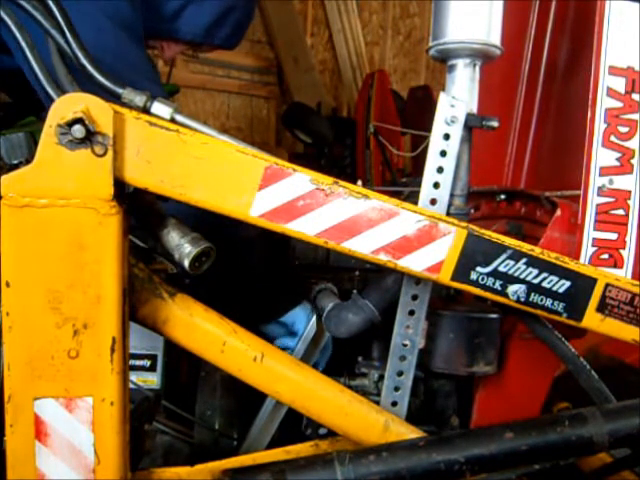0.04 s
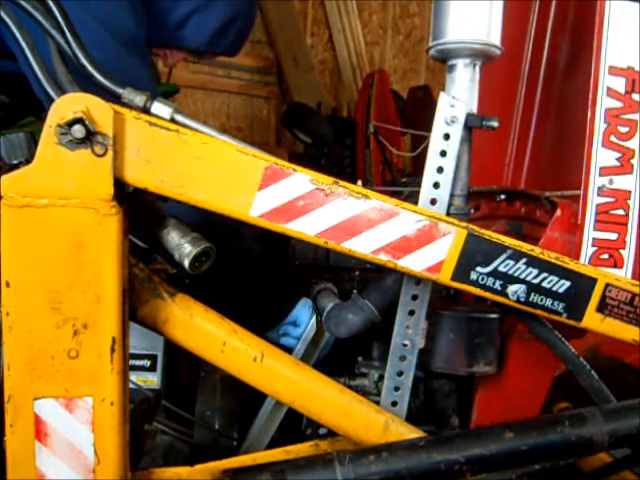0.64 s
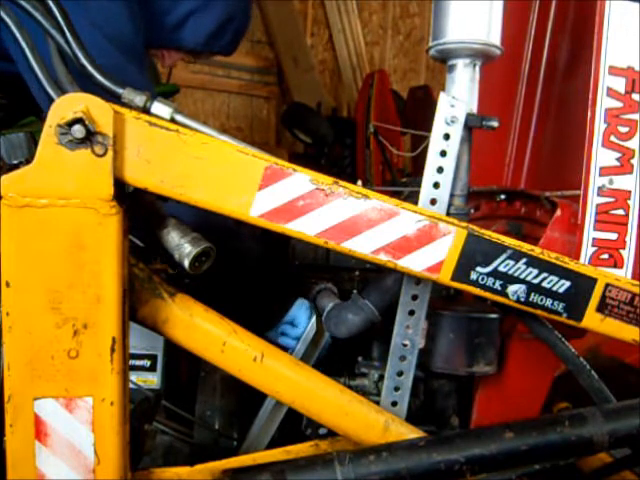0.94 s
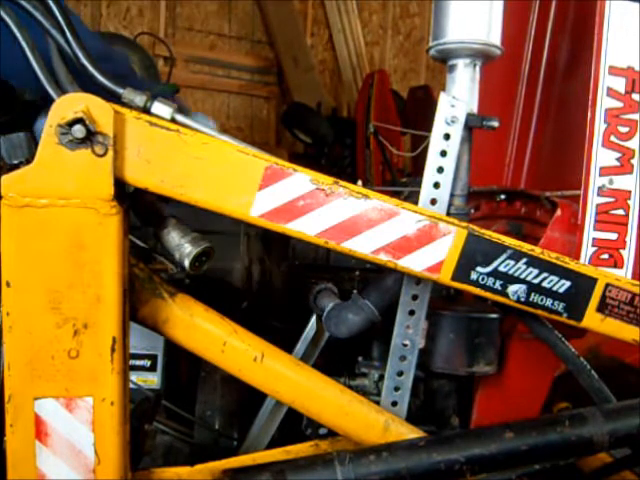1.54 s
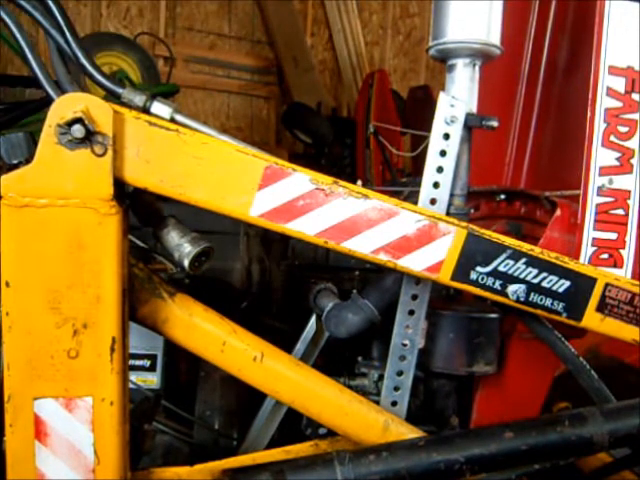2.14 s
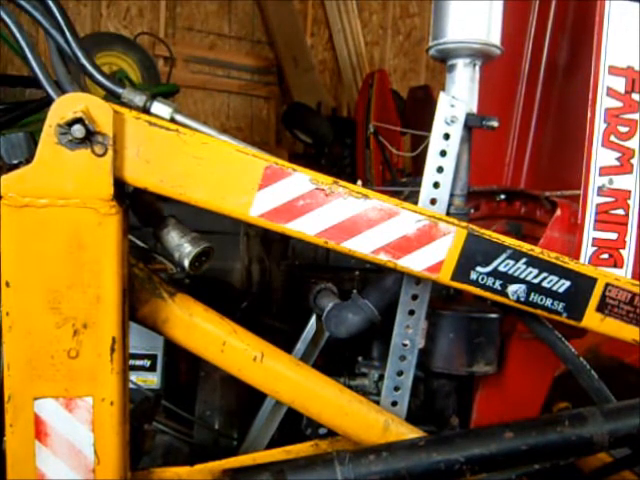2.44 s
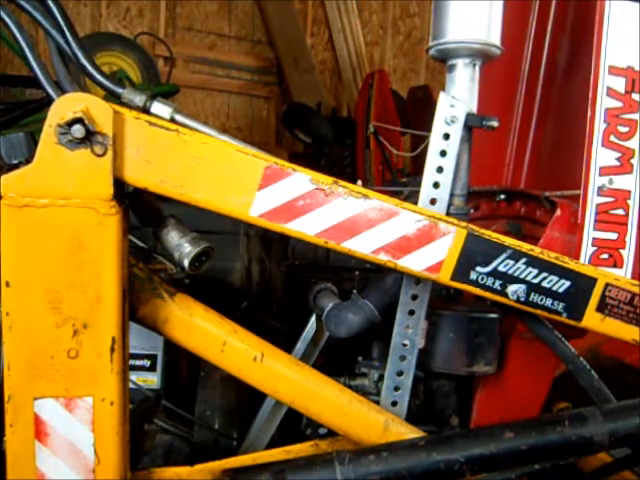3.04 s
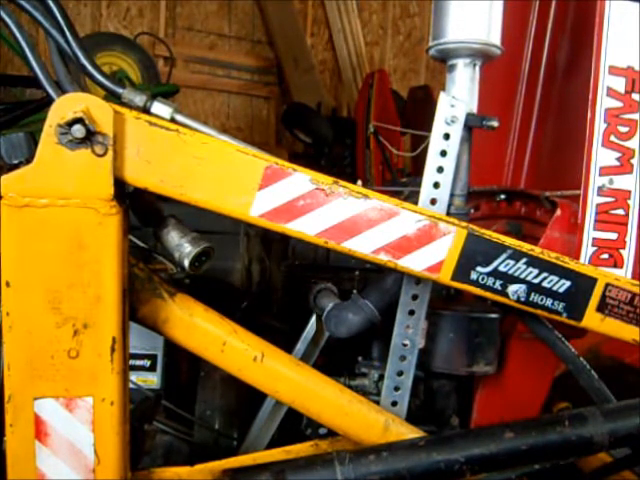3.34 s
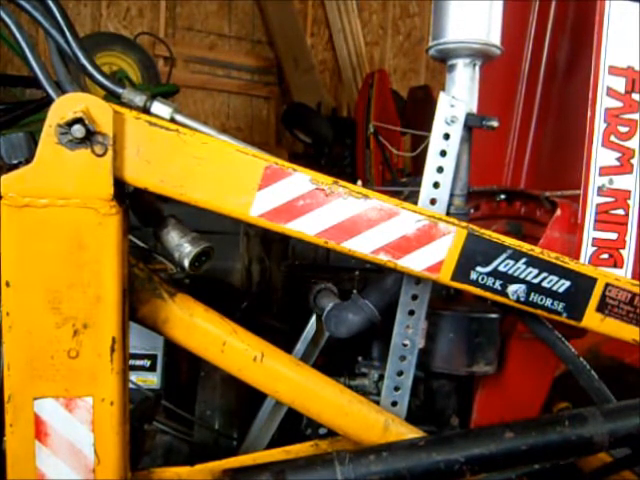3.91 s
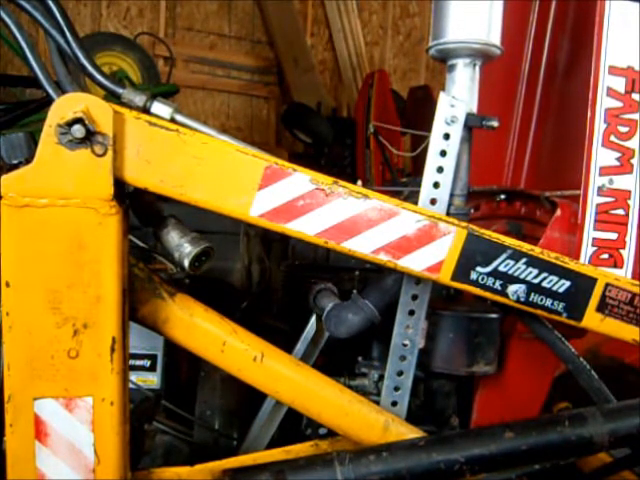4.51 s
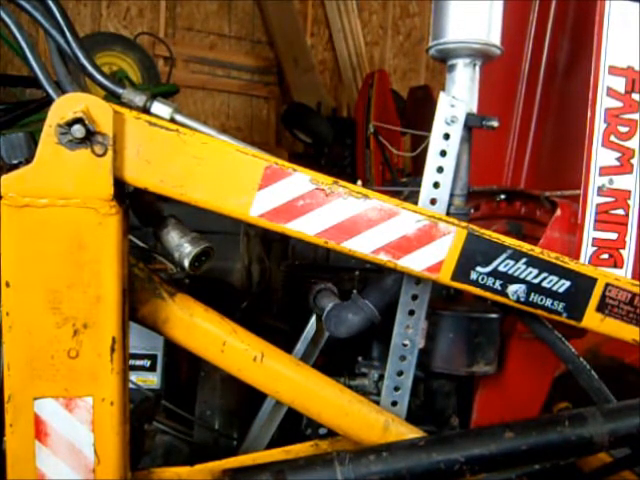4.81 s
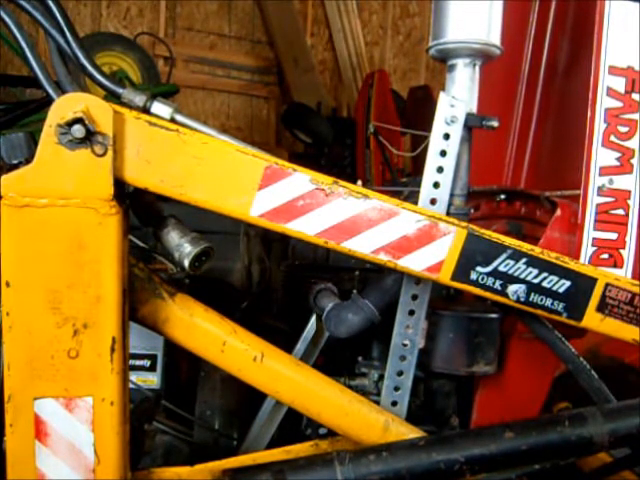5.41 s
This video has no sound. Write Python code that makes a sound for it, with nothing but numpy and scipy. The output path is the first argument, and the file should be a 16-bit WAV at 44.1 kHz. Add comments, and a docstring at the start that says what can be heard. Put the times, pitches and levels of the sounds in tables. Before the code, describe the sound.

In a wooden shed, hands work an engine's controls with dull knocks and a dry slide over a soft rush of air. Metal snaps and rings, and the single cylinder lurches once with a hollow shudder. After a sharp clank the engine turns over slowly, as if on its starter, with dry squeaks, deep exhaust puffs, valve clacks and ringing knocks over a drone of gears.

```python
"""Dull knocks and a dry slide over a soft rush of air: hands work the controls of an engine in a wooden
shed. Metal snaps and rings, the single cylinder lurches and stumbles, then after a sharp clank it turns
over slowly, as if on its starter. Each cycle brings dry squeaks, a deep exhaust puff, valve clacks and
a ringing knock as the piston tops its compression, over frame thumps and a drone of gears and casing."""
import sys
import numpy as np
from scipy import signal
from scipy.fft import rfft, irfft, next_fast_len
from scipy.io import wavfile
from scipy.ndimage import map_coordinates

SR = 44100
rng = np.random.default_rng(int(sys.argv[2]) if len(sys.argv) > 2 else 0)


def generate_wav(sig):
    """Save sig (samples, or channels by samples) to the path in sys.argv[1] as 16-bit PCM at SR."""
    pcm = np.round(np.clip(np.atleast_2d(sig).T, -1, 1) * 32767).astype(np.int16)
    wavfile.write(sys.argv[1], SR, pcm)


N = 245195

AIR_LEVELS = [(0.0, -46), (0.8, -44.3), (1.3, -43.5), (1.6, -41.3)]  # rush of air: time_s, level_db
RUMBLE_LEVELS = [(0.0, -58.5), (1.86, -48), (3.4, -58.5), (3.7, -44.5), (5.56, -51.5)]  # low rumble: time_s, level_db
# dull knocks of the controls and first kicks: start_s, level_db, tilt_db_per_octave, cutoff_hz, t60_s
CLUNK_HITS = [(0.212, -39, -2.5, 6000, 0.051), (1.597, -40, -3, 2500, 0.29), (1.658, -31, -1, 3280, 0.15),
              (2.164, -25.5, 1, 4800, 0.079), (2.31, -37.5, 1, 5000, 0.75), (2.818, -29, 1.5, 7000, 0.071),
              (2.828, -26.5, -1, 5500, 0.038), (2.88, -25.5, 3, 9000, 0.051),
              (2.938, -22, -.5, 8000, 0.039), (2.949, -20, -0.5, 9000, .09),
              (3.013, -29, -2.5, 3000, 0.055), (3.17, -36, 2.5, 4200, 0.38)]
SNAP_HITS = [(0.65, -32, 0, 5970, 0.024), (2.525, -16, 0.8, 6570, 0.037), (3.345, -14, 1, 9000, .028)]  # hard metal snaps: start_s, level_db, tilt_db_per_octave, cutoff_hz, t60_s
RINGING_PARTS = [(.214, 480, 300, -41.5, 0.59), (.388, 1030, 240, -41, 0.45),
                 (.6503, 3700, 900, -34, 0.016), (.69, 457, 197, -46.5, 0.56), (1.66, 338, 119, -37, 0.23),
                 (2.525, 2820, 2400, -24, 0.28), (2.526, 4660, 520, -37.5, 1.6),
                 (2.833, 2350, 300, -27.5, 0.042), (2.949, 630, 160, -18.5, 0.075),
                 (3.345, 1240, 199, -21, 0.11), (3.345, 5300, 350, -20, 0.026),
                 (3.345, 5900, 1800, -22.5, 0.21), (3.352, 500, 340, -25, 0.46)]  # knocked parts: start_s, pitch_hz, width_hz, level_db, t60_s
PING_NOTES = [(2.525, 2170, -37, 0.6), (3.346, 1344, -30.5, 1.1), (3.345, 1810, -28, .18),
              (3.345, 3440, -24.5, .16), (3.83, 5030, -19.5, 0.067)]  # clear notes of jarred metal, and a brief high chirp among the squeaks at 3.83 s: start_s, pitch_hz, level_db, t60_s
DRONE_LEVELS = [(3.42, -11), (3.48, -7), (3.55, -1.5), (3.68, -0.5), (3.93, 2.5), (4.28, 2.5), (4.6, -0.5),
                (5.56, -.5)]  # cranking effort against steady turning: time_s, gain_db
GEAR_STRAINS = [(3.897, 8.5, .045), (4.235, 5, 0.056), (4.537, 8, .025), (4.844, 3, 0.036)]  # compressions loading the gears: peak_s, strain_db, half_width_s
FRAME_JOLTS = [(3.5, -34, 0.2), (3.548, -30, .15), (3.765, -28, 0.12), (3.93, -28.5, 0.76),
               (4.11, -28, 0.083), (4.268, -28.5, 0.56), (4.596, -32.5, 0.77), (4.912, -32, 0.62),
               (5.231, -33.5, 0.38), (5.378, -32.5, .2)]  # thumps of the frame: start_s, level_db, damping_t60_s
SQUEAK_RUBS = [(3.561, 0.08, -17.5), (3.792, 0.044, -18), (3.959, 0.031, -24.5), (4.136, 0.031, -22),
               (4.294, 0.048, -21), (4.466, 0.036, -25.5), (4.62, 0.03, -22), (4.787, 0.032, -22.5),
               (4.941, .046, -24), (5.106, 0.037, -25), (5.259, 0.048, -24.5), (5.427, 0.034, -23)]  # one dry rub a turn: start_s, length_s, level_db
VALVE_TAPS = [(3.72, -23, 9.5, 0.068), (3.77, -29, 19, .1), (3.822, -28.5, -19.5, .2),
              (3.838, -24, -2, 0.091), (3.936, -28.5, 15, .08), (4.07, -27, 11, 0.25),
              (4.175, -20.5, 1, 0.07), (4.268, -30, 19.5, 0.065), (4.4, -30.5, 12, .1),
              (4.499, -25.5, 2, 0.08), (4.594, -34, 22, .05), (4.663, -31, -14, 0.08), (4.822, -25, 0, .12),
              (4.916, -34.5, 23, .06), (4.984, -31.5, -2, .07), (5.046, -29.5, 16, 0.082),
              (5.142, -25, 3.5, 0.085), (5.305, -28.5, -3.5, .06), (5.371, -25.5, 18, .045),
              (5.461, -26, 3.5, 0.12)]  # valve gear: start_s, level_db, treble_lift_db, t60_s
EXHAUST_PUFFS = [(3.721, -18), (4.074, -19), (4.403, -21.5), (4.723, -23), (5.046, -25.5), (5.367, -26)]  # the puff that opens each cycle: start_s, relative_db
PISTON_KNOCKS = [(3.9777, 0.5, 3800), (4.348, 0.5, 4670), (4.6841, 1, 2890), (4.997, -1.5, 3840),
                 (5.3246, -1, 2870)]  # tops of compression: start_s, relative_db, accent_hz

SHED_DECAY = [(200, 0.87), (1000, 0.54), (3500, 0.39), (8000, 0.27)]  # reverb of the wooden walls: frequency_hz, t60_s
CASING_MODES = [(292.5, 9, -0.5), (359, 11, -6.5), (467, 32, -4), (587.5, 16, -9)]  # humming casing: pitch_hz, width_hz, gain_db
FRAME_MODES = [(86.6, 0, .4), (146.3, 1.5, 0.23), (170.7, -3, 0.37), (205.5, 2.5, .3)]  # heavy frame: pitch_hz, gain_db, t60_s
METAL_MODES = [(1730, -7.5, 0.15), (2155, -6.5, 0.28), (2360, -14.5, 0.2), (2895, -2.5, .14),
               (3780, -5.5, 0.11), (4760, -4, .08), (5157, -10.5, 0.17), (5370, -6, .06),
               (6400, -12.5, .19)]  # bright engine metal: pitch_hz, gain_db, t60_s

# tone colour of each source: frequency_hz, gain_db
AIR_EQ = [(15, -16), (30, 0), (70, -5), (110, -11.5), (200, -8.5), (500, -9.5), (1400, -12), (6000, -17.5),
          (7800, -22)]
RUMBLE_EQ = [(15, -23), (30, -4.5), (75, 5), (130, -6.5), (260, -30.5), (500, -76)]
CLUNK_EQ = [(120, -13.5), (220, -8), (330, 3), (460, -7), (620, 2), (950, -5), (2400, -3), (4200, -8),
            (7800, -15)]
SNAP_EQ = [(200, -24), (330, -1), (480, -18.5), (700, -1), (1400, -2), (3800, 1), (5200, -5), (7800, -8.5)]
SLIDE_EQ = [(150, -14.5), (300, 6), (1100, -10), (2200, 0), (3800, 5), (5000, -3.5), (7500, -5)]
STUMBLE_EQ = [(110, -18), (230, -14.5), (370, -6), (480, -5), (610, 5), (850, -8), (2000, -8),
              (4200, -16.5), (7500, -30)]
CHURN_EQ = [(70, -35), (120, -6), (190, -1), (240, -3), (310, 0.5), (600, -2), (1100, -19.5), (2000, -61)]
RATTLE_EQ = [(300, -9), (700, 1), (1150, -2.5), (1600, -0.8), (2300, -4), (3500, -2), (4300, -16),
             (7500, -22)]
GROAN_EQ = [(260, -29), (360, -1.5), (520, -1.5), (640, 4), (800, -4.5), (1200, -23)]
CLACK_EQ = [(400, -37), (750, 6), (1050, -0.5), (1500, 7), (2250, 7.5), (3800, 5), (4400, 1.5),
            (7500, -9.5)]
KNOCK_EQ = [(300, -27), (520, -12.5), (1110, -12.5), (1740, -5.5), (2470, -11), (2840, 0.5), (3210, -9),
            (3810, -1), (4260, -9), (5370, -5), (7800, -15.5)]

SCENE_T, HIT_T = np.arange(N) / SR, np.arange(SR // 2) / SR  # seconds across the scene and one hit


def amp(db):
    return 10 ** (np.asarray(db) / 20)


def unit_rms(x):
    return x / np.sqrt(np.mean(x ** 2) + 1e-20)


def unit_onset(x):
    """Scale a hit to rms 1 over its first 20 ms."""
    return x / np.sqrt(np.mean(x[:SR // 50] ** 2) + 1e-20)


def curve_at(points, hz):
    """Read a curve on a log frequency axis."""
    point_hz, values = np.transpose(points)
    return np.interp(np.log(hz + 1), np.log(point_hz + 1), values)


def fader(points):
    """Ride the gain through the points, fading out within 50 ms beyond either end."""
    times, db = np.transpose(points)
    inside_s = np.minimum(SCENE_T - times[0], times[-1] - SCENE_T)
    return np.clip(inside_s * 20 + 1, 0, 1) ** 2 * amp(np.interp(SCENE_T, times, db))


def swell(peak_s, peak_db, rise_db_per_s, fall_db_per_s):
    """A gain that climbs to one peak and dies away."""
    t = SCENE_T - peak_s
    return amp(peak_db + np.minimum(rise_db_per_s * t, -fall_db_per_s * t))


def attack(rise_s):
    return 1 - np.exp(-HIT_T / rise_s)


def decay(t60_s):
    return amp(-60 * HIT_T / t60_s)


def wobble(rate_hz, n=N):
    """A smooth random drift."""
    knots = rng.standard_normal(int(n * rate_hz / SR) + 4)
    return map_coordinates(knots, [np.arange(n) * rate_hz / SR])


def filtered(x, response):
    """Apply a gain that depends on frequency."""
    size = next_fast_len(len(x) + SR // 4)
    return irfft(rfft(x, size) * response(np.fft.rfftfreq(size, 1 / SR)), size)[:len(x)]


def coloured(x, eq):
    """Shape x with an EQ curve, at rms 1."""
    return unit_rms(filtered(x, lambda hz: amp(curve_at(eq, hz))))


def burst(t60_s, rise_s):
    """The noise of one contact: quick attack, fast decay."""
    return rng.standard_normal(len(HIT_T)) * decay(t60_s) * attack(rise_s)


def chatter(per_second, spread_db, t60_s):
    """Many small contacts at uneven times and strengths."""
    sizes = amp(spread_db * rng.uniform(-1, 1, N))
    contacts = (rng.random(N) < per_second / SR) * sizes
    power = signal.fftconvolve(contacts ** 2, decay(t60_s) ** 2)[:N]
    return unit_rms(np.sqrt(np.abs(power)) * rng.standard_normal(N))


def struck(modes, spread_db, rise_s):
    """Struck metal: every hit wakes each mode at a new strength."""
    hz, db, t60_s = np.transpose(modes)[:, :, None]
    envelopes = amp(db + spread_db * rng.standard_normal(hz.shape)) * decay(t60_s)
    partials = np.sin(2 * np.pi * (hz * HIT_T + rng.random(hz.shape)))
    return unit_onset(np.sum(envelopes * partials, axis=0) * attack(rise_s))


def shed(x, wet_db):
    """Add the reverb of the wooden walls, where the treble dies first."""
    hz, t, spectrum = signal.stft(rng.standard_normal(SR // 2), SR, nperseg=256)
    fade = amp(-60 * t / curve_at(SHED_DECAY, hz)[:, None])
    tail = signal.istft(spectrum * fade, SR, nperseg=256)[1]
    return x + amp(wet_db) * signal.fftconvolve(x, tail / np.linalg.norm(tail))[:len(x)]


def air():
    """A soft rush around the shed, and a low rumble that is strongest as the cranking begins."""
    level_db = np.interp(SCENE_T, *np.transpose(AIR_LEVELS)) + 3.5 + wobble(8) / 2
    rush = amp(level_db) * coloured(rng.standard_normal(N), AIR_EQ)
    rumble = fader(RUMBLE_LEVELS) * coloured(rng.standard_normal(N), RUMBLE_EQ)
    return rush + rumble


def blows(hits, eq, rise_s, wet_db):
    """Metal and wood strike together: the softer the contact, the darker the hit."""
    out = np.zeros(N)
    for start_s, db, tilt, cutoff_hz, t60_s in hits:
        tilted_eq = [(hz, gain_db + tilt * np.log2(hz)) for hz, gain_db in eq]
        lowpass = signal.butter(4, cutoff_hz, fs=SR, output='sos')
        contact = signal.sosfilt(lowpass, burst(t60_s, rise_s))
        add(out, start_s, amp(db) * unit_onset(coloured(shed(contact, wet_db), tilted_eq)))
    return out


def ringing_parts():
    """A knocked part's close modes ring on as one fuzzy, fading note."""
    out = np.zeros(N)
    for start_s, hz, width, db, t60_s in RINGING_PARTS:
        band = [(hz - width, -30), (hz - width / 2, 0), (hz + width / 2, 0), (hz + width, -30)]
        cluster = coloured(rng.standard_normal(len(HIT_T)), band)
        add(out, start_s, amp(db) * unit_onset(cluster * decay(t60_s) * attack(.0019)))
    return out


def slide():
    """A dry metal part slides with an even hiss that swells and fades."""
    stroke = swell(peak_s=2.095, peak_db=-28.3, rise_db_per_s=68, fall_db_per_s=75)
    return stroke * coloured(rng.standard_normal(N), SLIDE_EQ)


def pings():
    """Single modes of jarred metal sing out as clear notes; a brief high chirp sounds among the squeaks."""
    out = np.zeros(N)
    for start_s, hz, db, t60_s in PING_NOTES:
        add(out, start_s, amp(db) * np.sin(2 * np.pi * hz * HIT_T) * decay(t60_s) * attack(.002))
    return out


def stumble():
    """The engine lurches round once with a hollow shudder; loose parts rattle on as it settles."""
    shudder = shed(chatter(per_second=300, spread_db=3, t60_s=.035), wet_db=-2)
    lurch = swell(peak_s=2.952, peak_db=-19, rise_db_per_s=150, fall_db_per_s=150)
    settle = swell(peak_s=2.95, peak_db=-37.5, rise_db_per_s=300, fall_db_per_s=24)
    return np.hypot(lurch, settle) * coloured(shudder, STUMBLE_EQ)


def cycle_swing(peak_share, outer_cycle_s=.33):
    """One swing of -1 to 1 a cycle, cresting peak_share of the way from puff to puff."""
    puff_s = [row[0] for row in EXHAUST_PUFFS]
    starts = [puff_s[0] - outer_cycle_s, *puff_s, puff_s[-1] + outer_cycle_s]
    cycle = np.interp(SCENE_T, starts, np.arange(len(starts)))
    return np.cos(2 * np.pi * (cycle - peak_share))


def gears(sag_per_db=.012):
    """Gears churn and rattle; under each early compression their groan swells and sags in pitch."""
    churn = coloured(chatter(per_second=150, spread_db=3.5, t60_s=.04), CHURN_EQ)
    teeth = chatter(per_second=280, spread_db=3.5, t60_s=.02)
    rattle = coloured(shed(teeth, wet_db=.5), RATTLE_EQ)
    strain_db = sum(db * np.exp(-((SCENE_T - s) / width) ** 2) for s, db, width in GEAR_STRAINS)
    steady_groan = coloured(rng.standard_normal(N), GROAN_EQ)
    groan = map_coordinates(steady_groan, [np.cumsum(1 - sag_per_db * strain_db)])
    swing_db = cycle_swing(peak_share=.63)
    return (amp(-34.5 + swing_db + .4 * strain_db) * churn
            + amp(-42.5 + swing_db + 1.83 * strain_db) * groan
            + amp(-32 + .34 * strain_db) * rattle)


def casing_hum(level_db=-35.5, swing_db=5.5, build_s=.33):
    """The casing's hum builds up and sinks at each compression; wider resonances waver faster."""
    hum = np.zeros(N)
    for hz, width_hz, db in CASING_MODES:
        strength = amp(db + 2.8 * wobble(2 * width_hz))
        hum += strength * np.sin(2 * np.pi * hz * SCENE_T + 1.26 * wobble(width_hz))
    cranking_s = np.maximum(SCENE_T - DRONE_LEVELS[0][0], 0)
    build_up = 1 - np.exp(-cranking_s / build_s)
    return amp(level_db + swing_db * cycle_swing(peak_share=.36)) * build_up * unit_rms(hum)


def frame_jolts():
    """The crank's changes of load thump the heavy frame."""
    out = np.zeros(N)
    for start_s, db, t60_s in FRAME_JOLTS:
        thump = struck(FRAME_MODES, spread_db=1, rise_s=.0036) * decay(t60_s)
        add(out, start_s, amp(db) * unit_onset(thump))
    return out


def squeaks(base_hz=3425, arch_share=.0604):
    """A dry part rasps once a turn, less as it frees; a hard, quick rub arches highest in pitch."""
    out = np.zeros(N)
    hardest = max(amp(db) / length_s for _, length_s, db in SQUEAK_RUBS)
    for start_s, length_s, db in SQUEAK_RUBS:
        arch = np.sin(np.pi * np.clip(HIT_T / length_s, 0, 1))
        pressure = amp(db) / length_s / hardest
        pitch_hz = base_hz * (1 + arch_share * pressure * arch + .016 * wobble(500, len(HIT_T)))
        rasp = unit_rms(1 + .55 * wobble(520, len(HIT_T)))
        tone = np.sqrt(np.abs(arch)) * np.sin(2 * np.pi * np.cumsum(pitch_hz) / SR) * rasp
        add(out, start_s, amp(db) * shed(tone, wet_db=-4))
    return out


def valve_clacks():
    """The valve gear taps the engine's metal: a crisp contact, its echo and a faint ring."""
    out = np.zeros(N)
    for start_s, db, lift_db, t60_s in VALVE_TAPS:
        eq = [(hz, gain_db + lift_db * np.clip(np.log2(hz / 2500), 0, 1)) for hz, gain_db in CLACK_EQ]
        contact = unit_onset(coloured(burst(t60_s, rise_s=.0013), eq))
        tap = shed(contact, wet_db=-1.5)
        ring = amp(-11) * struck(METAL_MODES, spread_db=6, rise_s=.003)
        add(out, start_s, amp(db) * (tap + ring))
    return out


def exhaust_puffs(pitch_hz=38):
    """The exhaust lets out one soft, deep push of gas a cycle."""
    out = np.zeros(N)
    push = np.sin(2 * np.pi * pitch_hz * HIT_T) * np.exp(-((HIT_T - .014) / .014) ** 2)
    for start_s, db in EXHAUST_PUFFS:
        gas = unit_onset(coloured(burst(t60_s=.14, rise_s=.01), RUMBLE_EQ))
        add(out, start_s, amp(db - 9) * push + amp(db - 11) * gas)
    return out


def piston_knocks(accent_db=7, width_hz=270):
    """The piston tops its compression: a light tick, then a crack that favours one pitch and rings."""
    out = np.zeros(N)
    for start_s, db, accent_hz in PISTON_KNOCKS:
        accent = lambda hz: amp(accent_db * np.exp(-((hz - accent_hz) / width_hz) ** 2))
        contact = unit_onset(coloured(burst(t60_s=.022, rise_s=.001), KNOCK_EQ))
        crack = unit_onset(filtered(contact, accent))
        echo = shed(contact, wet_db=-2) - contact
        tick = unit_onset(coloured(burst(t60_s=.05, rise_s=.00038), KNOCK_EQ))
        ring = struck(METAL_MODES, spread_db=2.5, rise_s=.0038)
        add(out, start_s, amp(db - 22) * tick)
        add(out, start_s + .0018, amp(db - 16.5) * (crack + echo) + amp(db - 22) * ring)
    return out


def add(track, start_s, sound):
    """Mix a sound into the track."""
    part = track[round(start_s * SR):][:len(sound)]
    part += sound[:len(part)]


def scene():
    """The air bed, the handling and first lurch, then the engine turning over, mixed in mono."""
    clunks = blows(CLUNK_HITS, CLUNK_EQ, rise_s=.0017, wet_db=-3)
    snaps = blows(SNAP_HITS, SNAP_EQ, rise_s=.0008, wet_db=-4)
    lead_in = clunks + snaps + ringing_parts() + slide() + pings() + stumble()
    drone = fader(DRONE_LEVELS) * (gears() + casing_hum())
    beats = frame_jolts() + squeaks() + valve_clacks() + exhaust_puffs() + piston_knocks()
    return (air() + lead_in + drone + beats)[None]


def record(dry):
    """Round off the highest peaks and roll off the top end."""
    ceiling, top_hz = .95, 7600
    rounded = dry[0] / (1 + np.abs(dry[0] / ceiling) ** 6) ** (1 / 6)
    return filtered(rounded, lambda hz: amp(-np.maximum(hz - top_hz, 0) / 20))[None]


dry = scene()
out = record(dry)
generate_wav(out)
```